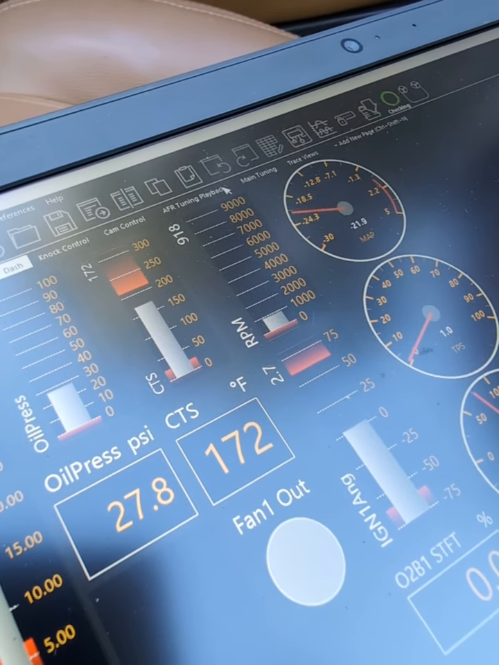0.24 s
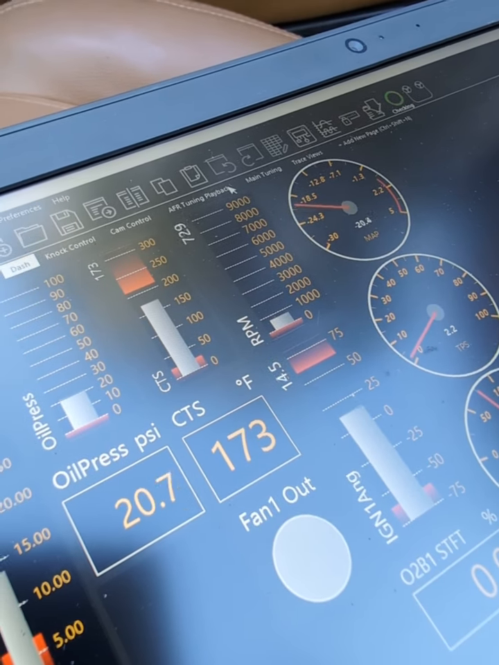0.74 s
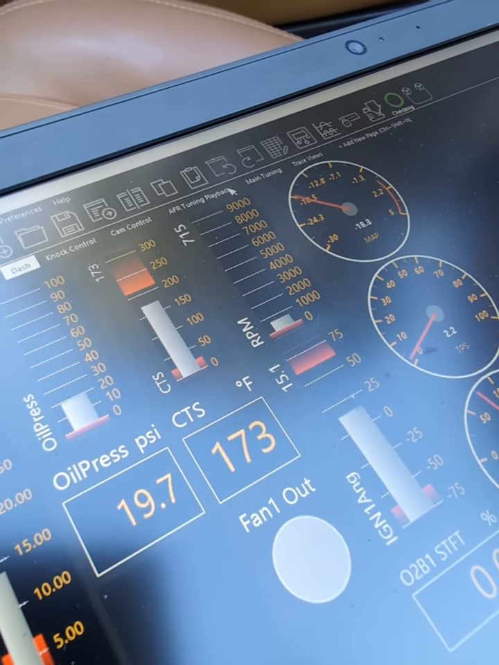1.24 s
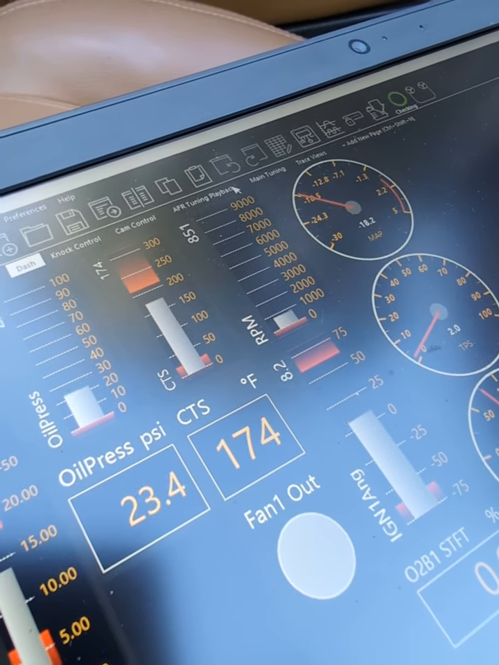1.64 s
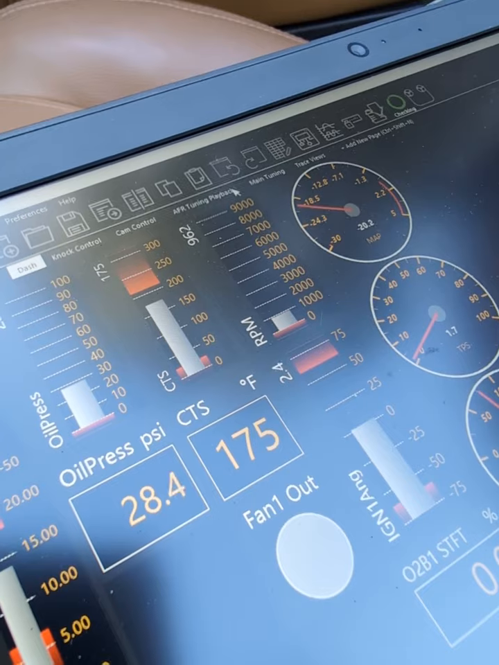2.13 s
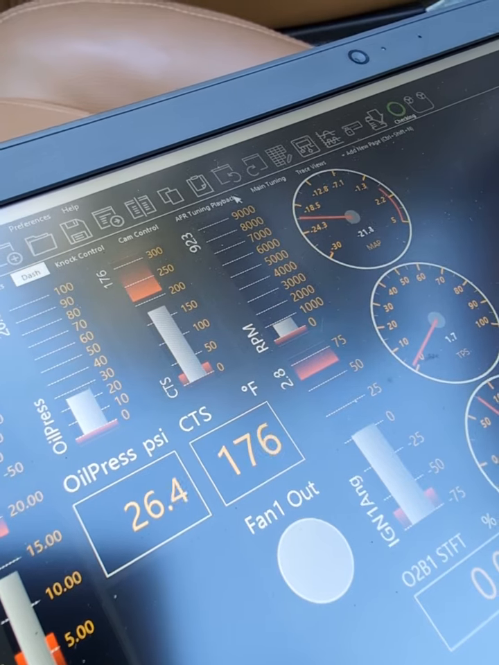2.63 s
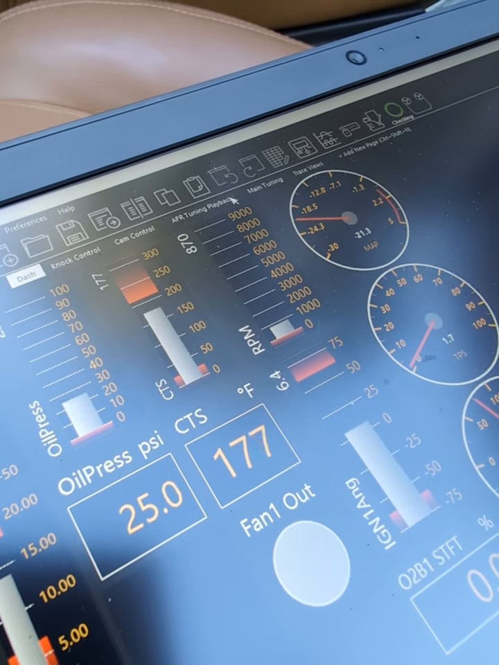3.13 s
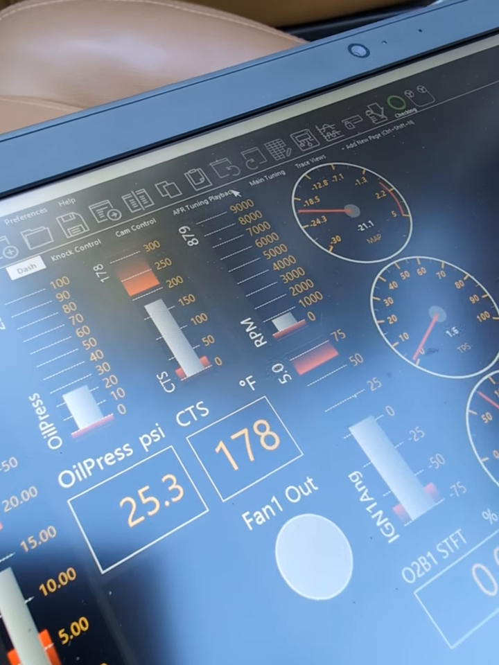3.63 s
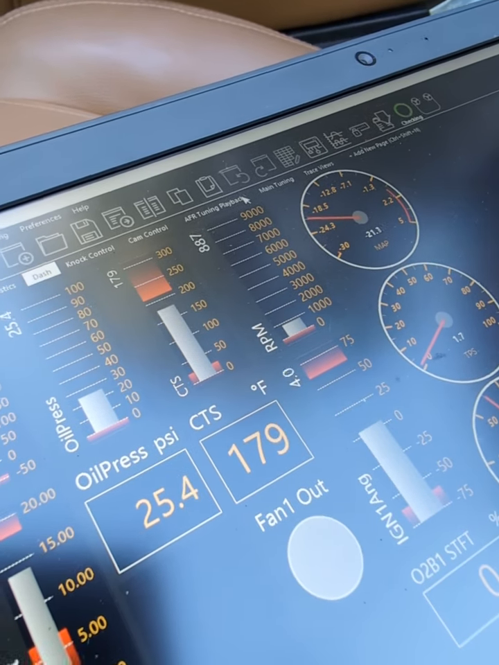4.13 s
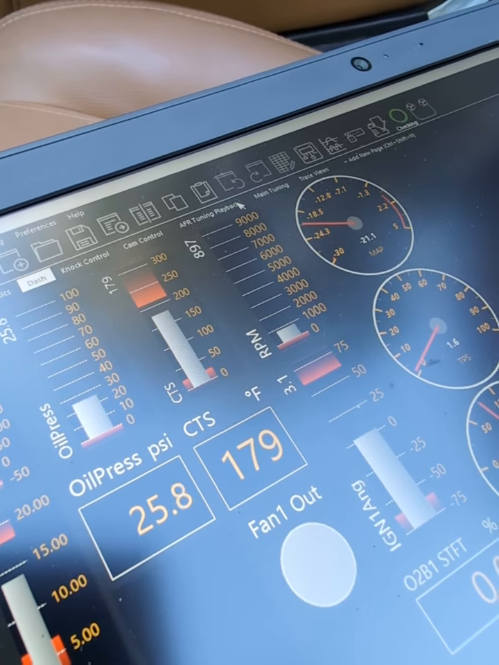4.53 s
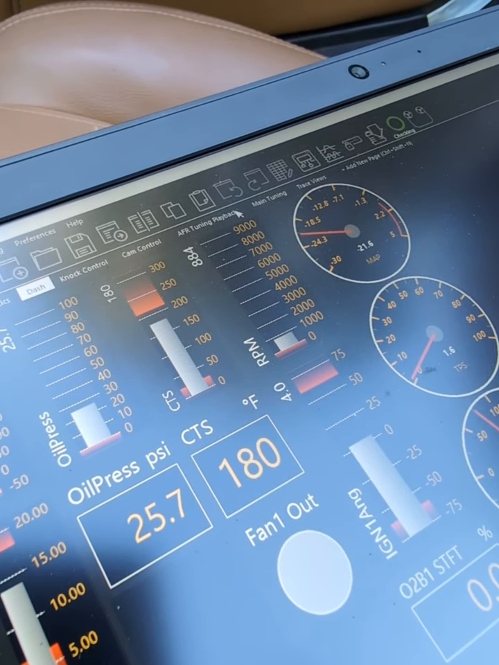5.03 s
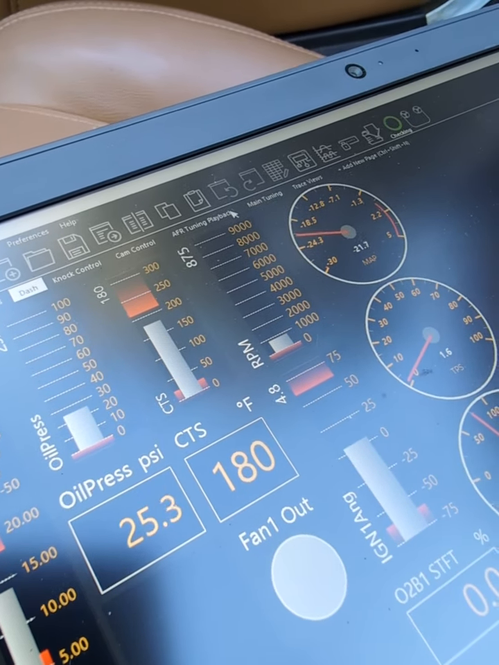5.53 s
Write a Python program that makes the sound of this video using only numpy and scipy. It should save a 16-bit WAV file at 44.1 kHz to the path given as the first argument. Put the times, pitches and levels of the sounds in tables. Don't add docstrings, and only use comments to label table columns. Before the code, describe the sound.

Inside a parked car, a deep exhaust drone near 64 hertz starts strong, drops in pitch and nearly fades as the engine stumbles, then swells back slightly too fast and settles. Soft panel knocks, faint gear whine, valve clatter and airy hiss sit underneath. A few tiny falling belt squeaks appear. Close cabin stereo, bass heavy, no distinct echo.

```python
import sys
import numpy as np
from scipy import signal
from scipy.fft import rfft, irfft, next_fast_len
from scipy.io import wavfile
from scipy.ndimage import uniform_filter1d, map_coordinates

SR = 44100
rng = np.random.default_rng(int(sys.argv[2]) if len(sys.argv) > 2 else 0)


def gain_from_decibels(decibels):
    exponent = np.asarray(decibels, float) / 20
    return 10 ** exponent


def pcm_store(signal):
    levels = np.round(np.clip(np.atleast_2d(signal), -1, 1) * 32767)
    wavfile.write(sys.argv[1], SR, levels.astype(np.int16).T)


N = 255780

PER_CYCLE = 8
IDLE_DRONE_DB = -17
KNEE_RATE = 57


def unit(x):
    return x / np.sqrt(np.mean(x ** 2) + 1e-20)


def along(points, hz):
    f, v = np.transpose(points)
    return np.interp(np.log(hz + 1), np.log(f + 1), v)


def curves(rows):
    s, *cols = np.transpose(rows)
    return [np.interp(np.arange(N) / SR, s, c) for c in cols]


def wobble(rate):
    knots = rng.standard_normal(int(N * rate / SR) + 4)
    return map_coordinates(knots, [np.arange(N) * rate / SR])


def filtered(x, response):
    m = next_fast_len(N + SR // 2)
    return irfft(rfft(x, m) * response(np.fft.rfftfreq(m, 1 / SR)), m)[..., :N]


def minimum_phase(points, hz):
    cepstrum = irfft(np.log(gain_from_decibels(along(points, hz))))
    cepstrum[1:len(cepstrum) // 2] *= 2
    cepstrum[len(cepstrum) // 2 + 1:] = 0
    return np.exp(rfft(cepstrum))[:len(hz)]


def ringing(modes, twist=0):
    def response(f):
        total = 0
        for k, (center, width, db) in enumerate(modes):
            resonance = 1j * f * width / (center * center - f * f + 1j * f * width)
            total = total + (-1) ** k * np.exp(1j * twist * k) * gain_from_decibels(db) * resonance
        return total
    return response


def rush(response):
    # frequency in Hz, left-right correlation.
    alike = [(60, 0.91), (180, 0.78), (540, 0.46), (1640, -0.31), (4940, 0.02), (14900, -0.15)]

    def mid_side(hz):
        turn = np.arccos(np.clip(along(alike, hz), -1, 1)) / 2
        return response(hz) * [np.cos(turn), np.sin(turn)]

    mid, side = filtered(rng.standard_normal((2, N)), mid_side)
    return unit(np.array([mid + side, mid - side]))


def firings(fired, sizes, scatter, jitter_ms):
    count = np.arange(1, int(fired[-1]))
    chance = rng.standard_normal((len(count), 2))
    at = np.interp(count, fired, np.arange(N)) + jitter_ms * chance[:, 0] * SR / 1000
    strength = sizes[count % PER_CYCLE] + scatter * chance[:, 1]
    return np.bincount(np.clip(at.astype(int), 0, N - 1), strength, N)


def drone(fired, boom_db, stumble):
    cylinders = [.8, 1.6, .2, -.6, -1.7, -1.9, .6, .6]
    excess = gain_from_decibels(cylinders) - np.mean(gain_from_decibels(cylinders))
    parts = np.fft.fft(excess) / PER_CYCLE
    lope = sum(parts[k] * 1.4 * np.exp(2j * np.pi * k * fired / PER_CYCLE) for k in (1, 2, 3))
    lope = 1 + lope + .4 * np.conj(lope)
    unsteady = gain_from_decibels(.35 * stumble * wobble(11)) * np.exp(.03j * stumble * wobble(11))
    return gain_from_decibels(boom_db) * np.real(lope * unsteady * np.exp(2j * np.pi * fired))


def overtones(fired, rate, stumble):
    # multiple of the firing rate, lead over the drone in ms, the same in ms below the knee.
    tones = [(1.5, -2.2, 57), (2, 43.1, 3), (2.5, 25.8, 30)]
    speeds = [46, 48.5, 51, 54, 57, 59, 62, 65]
    passed_db = [(-30.5, -33.5, -30.5, -40, -38.5, -39.5, -41, -33),
                 (-33, -32, -40.5, -46.5, -41, -40, -34.5, -39),
                 (-45, -46, -51.5, -51.5, -46.5, -44.5, -39.5, -37.5)]
    pull_db = [0.19, 0.18, 0.26]
    limp, limp_at = .45, .77

    pulling = np.gradient(rate) * SR * np.clip((rate - KNEE_RATE + 3) / 6, 0, 1)
    levels_db = [np.interp(rate, speeds, db) + pull * pulling for db, pull in zip(passed_db, pull_db)]
    swell = np.cos(2 * np.pi * (fired / PER_CYCLE - limp_at))
    levels_db[0] = levels_db[0] + 4 * limp * (stumble - 1) * swell
    sound = np.zeros(N)
    for (times, lead_ms, slow_ms), db in zip(tones, levels_db):
        lead_above = np.maximum(rate, KNEE_RATE) * lead_ms
        lead_below = np.minimum(rate - KNEE_RATE, 0) * slow_ms
        phase = 2 * np.pi * times * (fired + (lead_above + lead_below) / 1000)
        level = gain_from_decibels(db + .8 * np.sqrt(stumble) * wobble(16))
        sound += level * np.cos(phase + .12 * wobble(10))
    return sound


def exhaust_puffs(fired):
    # frequency in Hz, gain from exhaust to cabin in dB.
    pipe = [(40, -40), (62, -18), (80, -10), (93, -13), (104, -14), (113, -8), (124, 0), (142, -3),
            (156, -7), (170, -20), (260, -24), (500, -70), (1500, -110)]
    sizes = np.roll([3, 0, -1, 0, -1, 0, -1, 0], 1)
    puffs = firings(fired, sizes, scatter=.25, jitter_ms=.1)
    return unit(filtered(puffs, lambda hz: minimum_phase(pipe, hz)))


def exhaust(fired, rate, boom_db):
    stumble = 1 + np.clip(56 - rate, 0, None) / 4
    tones = drone(fired, boom_db, stumble) + overtones(fired, rate, stumble)
    return np.sqrt(2) * tones + gain_from_decibels(-42 + .15 * (boom_db - IDLE_DRONE_DB)) * exhaust_puffs(fired)


def block(fired, block_db):
    # frequency in Hz, width in Hz, level in dB.
    panels = [(218.1, 9.5, -8), (238.7, 14, 1.5), (276.2, 14, -3), (315, 16, -1.5), (411.4, 45, -11.5),
              (538.4, 33, -4), (573, 20, -5), (619.5, 13, -4.5)]
    # frequency in Hz, noise density in dB per Hz.
    rumble = [(15, -26), (30, -20), (45, -15), (72, -3), (100, -15), (150, -19), (190, -32), (260, -32),
              (330, -27), (420, -28), (490, -31), (600, -30), (700, -46), (1200, -120)]
    sizes = np.array([1, .1, .8, .15, 1.05, .1, .85, .15])
    knocks = firings(fired, sizes, scatter=.08, jitter_ms=.04)
    knocks = unit(filtered(knocks, ringing(panels, twist=np.array([[-.12], [.12]]))))
    load = gain_from_decibels(1.3 * (block_db + 41.7))
    ring = gain_from_decibels(-8) * load * knocks
    ring = ring + gain_from_decibels(-9.5 + .6 * wobble(20)) * np.sqrt(load) * rush(ringing(panels))
    rumbling = rush(lambda hz: gain_from_decibels(along(rumble, hz)))
    return gain_from_decibels(block_db) * (gain_from_decibels(-1.5) * ring + gain_from_decibels(3) * rumbling)


def gears(fired, rate):
    # turns per engine cycle, level in dB, left minus right in dB, left lead in radians.
    whines = [(5.6, -44, 0, 0), (24, -59, 0, .4), (28, -51, 0, .4), (32, -49, 1, .3), (36, -58, 2, 0),
              (42, -53, -4, .1), (44, -58, -1, 0), (52, -59.5, 1, .3), (56, -54, 4, .1),
              (68, -50.5, -2, 1.2), (72, -57, 3, .1), (78, -58, -8, -.9), (84, -54, -5, .3),
              (92, -64, 2, .2), (128, -66, 6, -1.5), (184, -69, 2, -1.5), (252, -73, 3, -1.4),
              (272, -69.5, 2, -1.5)]
    # frequency in Hz, gain of the path into the cabin in dB.
    bulkhead = [(200, -5), (225, 0), (420, 0), (445, -11), (505, -10), (548, 6), (568, -11), (605, 0),
                (635, 0), (665, -13), (900, 0)]
    smear_db = 0.11
    sides = np.array([[.5], [-.5]])
    cycle = 2 * np.pi * fired / PER_CYCLE
    tones = np.zeros((2, N))
    for turns, db, pan_db, lead in whines:
        level = gain_from_decibels(db + (.7 + turns / 110) * wobble(4)) * gain_from_decibels(pan_db * sides)
        unsteady = (.08 + turns / 300) * wobble(14)
        tones += level * np.cos(turns * cycle + unsteady + lead * sides)
    slow_db = -.9 * np.clip(58 - rate, 0, None)
    change_db = -smear_db * abs(np.gradient(rate) * SR)
    return np.sqrt(2) * gain_from_decibels(slow_db + change_db) * filtered(tones, lambda hz: gain_from_decibels(along(bulkhead, hz)))


def valves(block_db):
    # frequency in Hz, noise density in dB per Hz.
    clatter = [(380, -25.5), (650, -16.5), (730, -11.5), (888, -15), (1050, -12.5), (1300, -11),
               (1440, -14.5), (2050, -13.5), (3300, -22), (3860, -26), (5600, -29), (6450, -23.5),
               (7200, -34), (15800, -120)]
    # frequency in Hz, width in Hz, level in dB.
    covers = [(1050, 4.7, -10.5), (1052, 36, 4.5), (1337, 16, -1.5), (1653, 29, -4), (1970, 14, -8),
              (2526, 18, -4.5)]
    sound = rush(lambda hz: gain_from_decibels(along(clatter, hz))) + gain_from_decibels(-5.5) * rush(ringing(covers))
    return gain_from_decibels(-56.5 + 0.87 * (block_db + 43.0) + 0.53 * wobble(30)) * sound


def intake(fired, hiss_db):
    # frequency in Hz, noise density in dB per Hz.
    hiss = [(4120, -34.5), (7000, 3), (10000, 2), (11400, 5), (14800, 0.5), (15500, -6.5)]
    puff = np.exp(6 * (np.cos(2 * np.pi * (fired / PER_CYCLE - .39)) - 1))
    return gain_from_decibels(hiss_db + 3.1 * puff + 0.92 * wobble(24)) * rush(lambda hz: gain_from_decibels(along(hiss, hz)))


def belt():
    # start in seconds, length in seconds, first frequency in Hz, last in Hz, level in dB.
    squeaks = [
        (2.13, .11, 2720, 2600, -61),
        (3.32, .17, 3150, 2250, -62.5),
        (5.36, .18, 2750, 2350, -63.5),
    ]
    out = np.zeros(N)
    hoarse = 1.1 * wobble(250)
    for s, length, from_hz, to_hz, db in squeaks:
        n, start = round(length * SR), round(s * SR)
        glide = np.cumsum(np.linspace(from_hz, to_hz, n)) / SR
        tone = np.sin(2 * np.pi * glide + hoarse[start:][:n])
        out[start:][:n] += gain_from_decibels(db) * np.sqrt(np.hanning(n)) * tone
    return out * gain_from_decibels(2 * wobble(60) + np.array([[-1.5], [1.5]]))


def scene():
    # time in seconds, firings per second, drone level in dB.
    hunting = [(0, 64.06, -11.0), (0.12, 64.38, -11.3), (0.31, 62.29, -14.0), (0.53, 52.62, -25.4),
               (0.83, 48.28, -27.9), (1.1, 46.19, -32.7), (1.42, 51.03, -17.9), (1.7, 59.25, -12.7),
               (2.07, 63.55, -10.0), (2.38, 64.97, -14.1), (2.74, 61.92, -13.5), (2.82, 60.66, -14.1),
               (3.03, 58.54, -17.5), (3.22, 57.93, -18.5), (3.98, 58.93, -17.5), (4.56, 60.2, -15.6),
               (5.42, 58.13, -19.3), (5.8, 58.9, -19.0)]
    flywheel_s = .12
    tailpipe_s, idle_rate = .058, 58.8
    rate, boom_db = curves(hunting)
    rate = uniform_filter1d(rate, round(flywheel_s * SR), mode="nearest")
    fired = np.cumsum(rate) / SR - .03
    shaft = fired + (rate - idle_rate) * tailpipe_s
    effort_db = boom_db - IDLE_DRONE_DB
    block_db = -39.5 + 0.13 * effort_db
    hiss_db = -66.5 + 0.36 * effort_db
    engine = exhaust(fired, rate, boom_db) + block(shaft, block_db) + gears(shaft, rate)
    return engine + valves(block_db) + intake(shaft, hiss_db) + belt()


def roll_off(x):
    return signal.sosfilt(signal.butter(12, 15480, fs=SR, output="sos"), x)


def record(dry):
    # frequency in Hz, left minus right in dB.
    lean = [(60, -1.0), (110, -0.5), (200, -0.5), (380, -3.0), (700, -5.5), (1280, -2.5), (2370, -0.5),
            (4370, -0.5), (8060, 0.5), (14900, 0.5)]
    sides = np.array([[.5], [-.5]])

    def ports(hz):
        delay_s = 2e-4 * sides * (hz < 200)
        return gain_from_decibels(along(lean, hz) * sides) * np.exp(2j * np.pi * hz * delay_s)

    return roll_off(filtered(dry, ports))


dry = scene()
out = record(dry)
pcm_store(out)
```